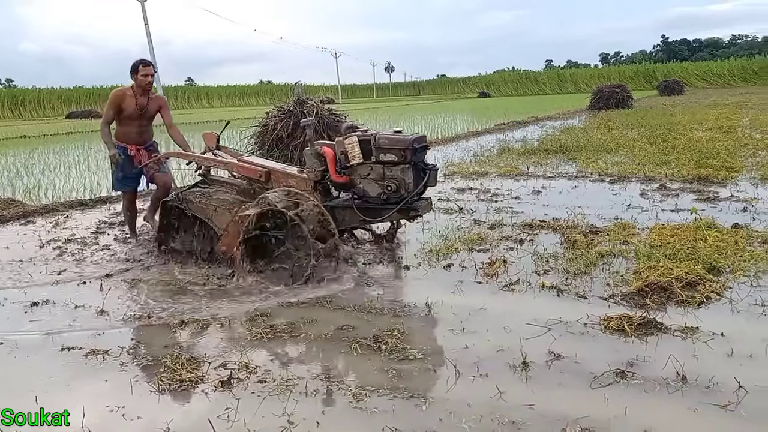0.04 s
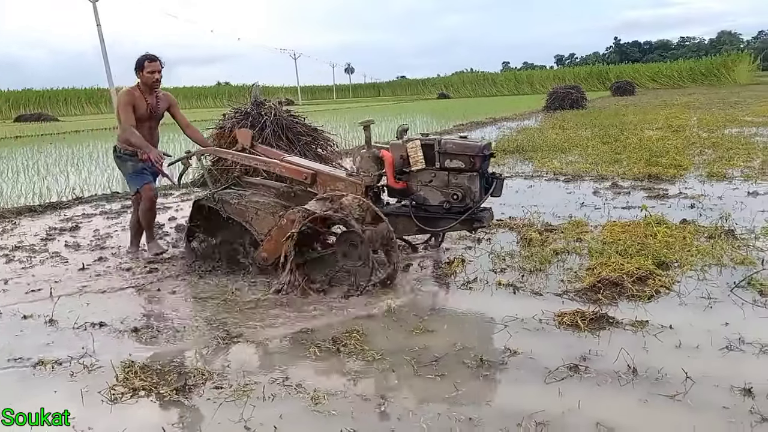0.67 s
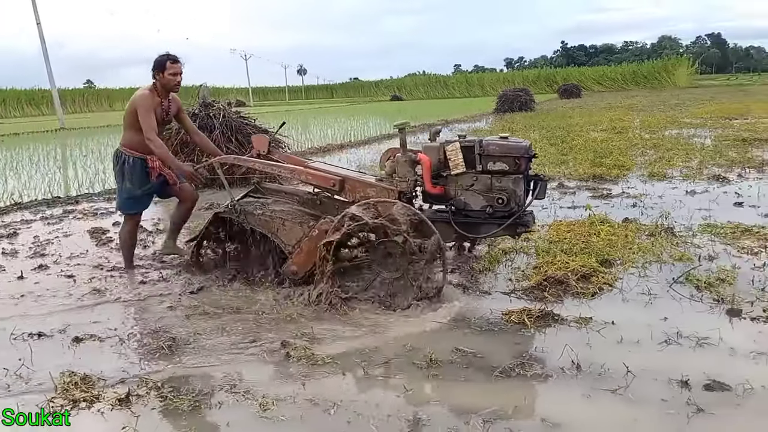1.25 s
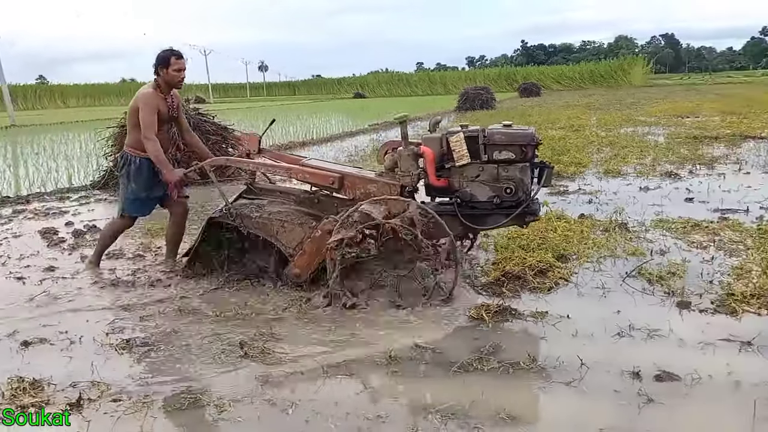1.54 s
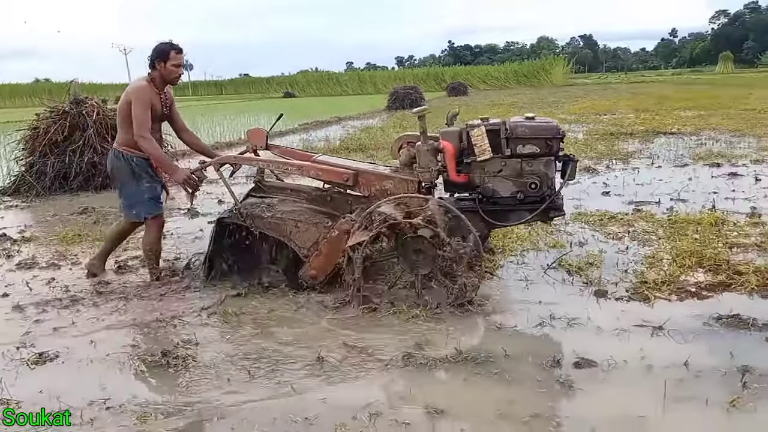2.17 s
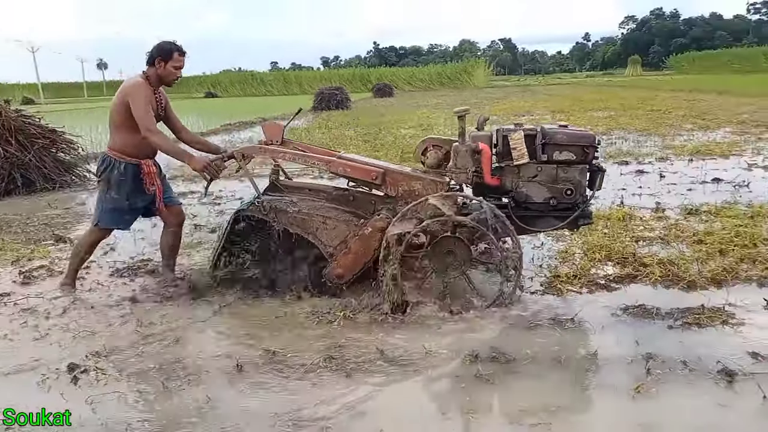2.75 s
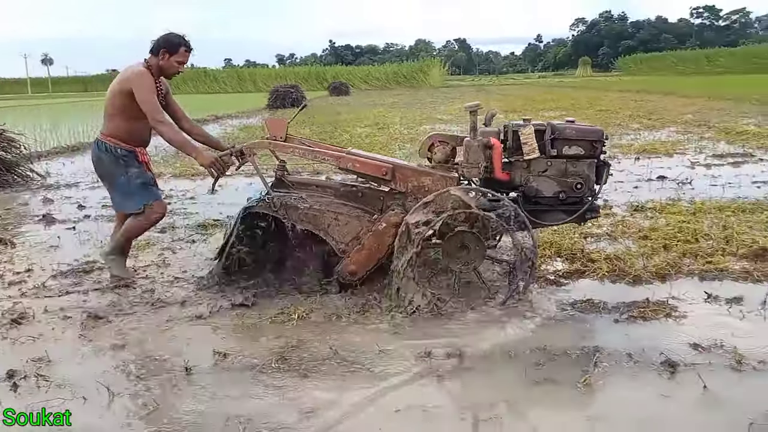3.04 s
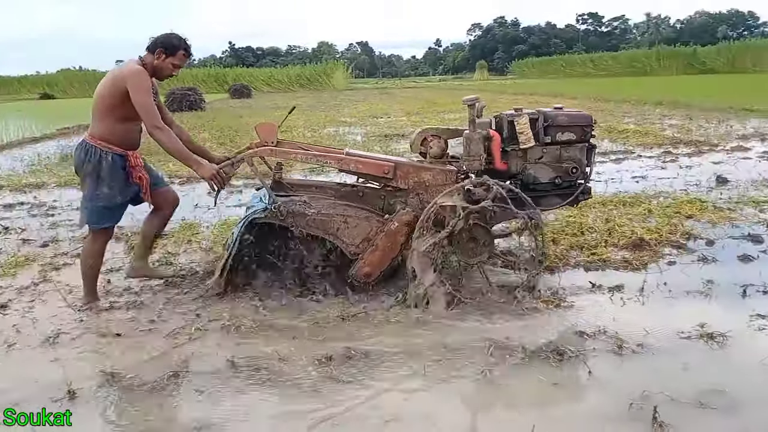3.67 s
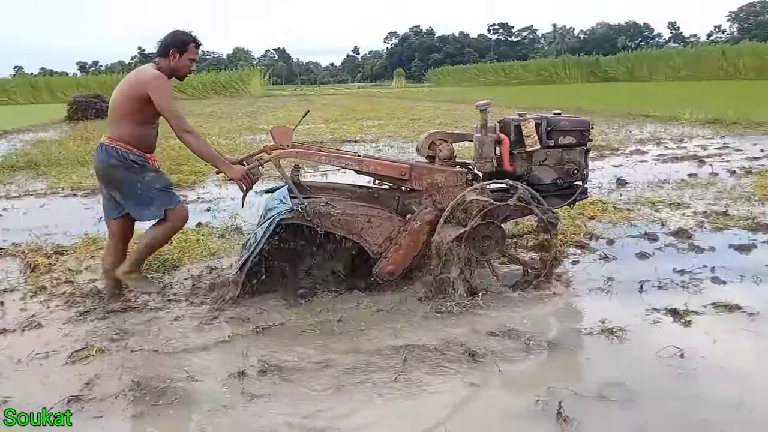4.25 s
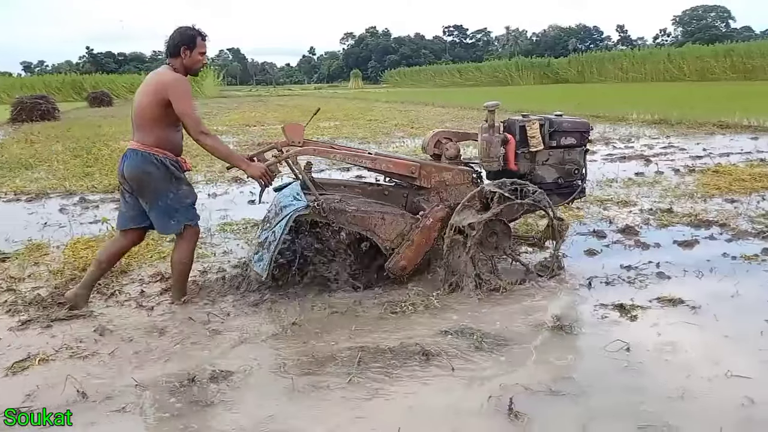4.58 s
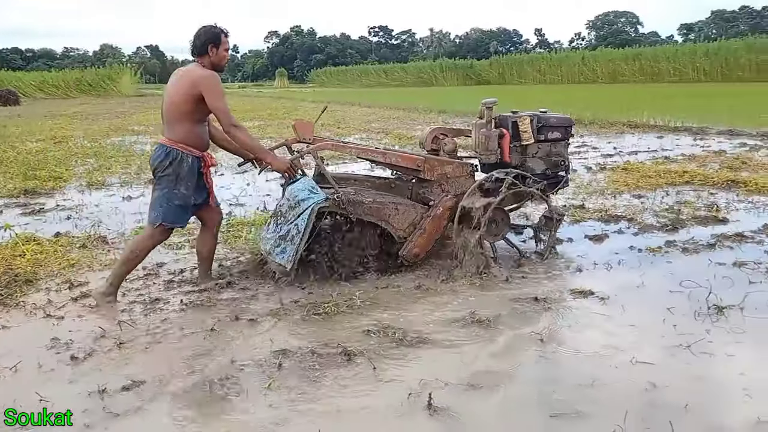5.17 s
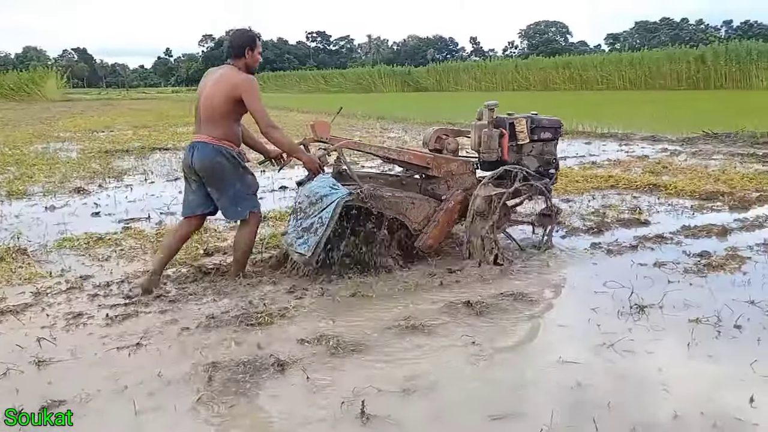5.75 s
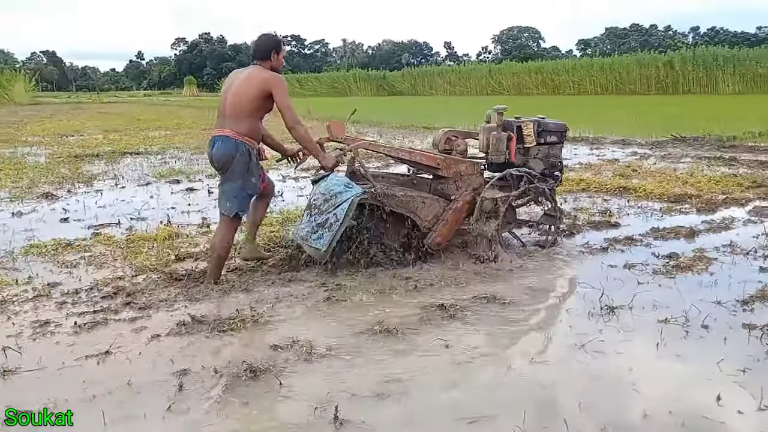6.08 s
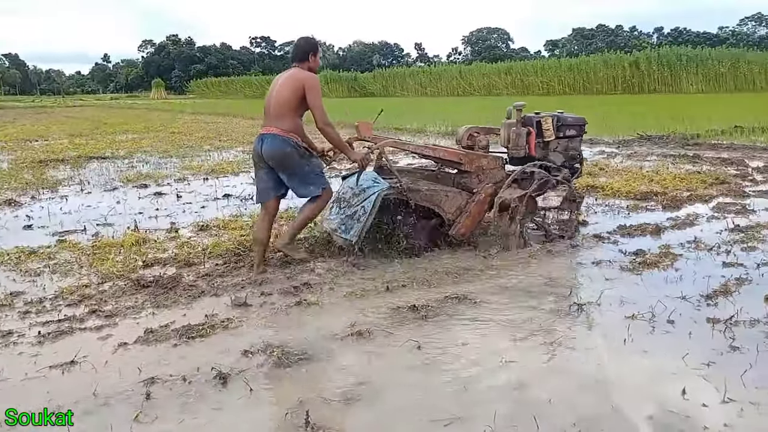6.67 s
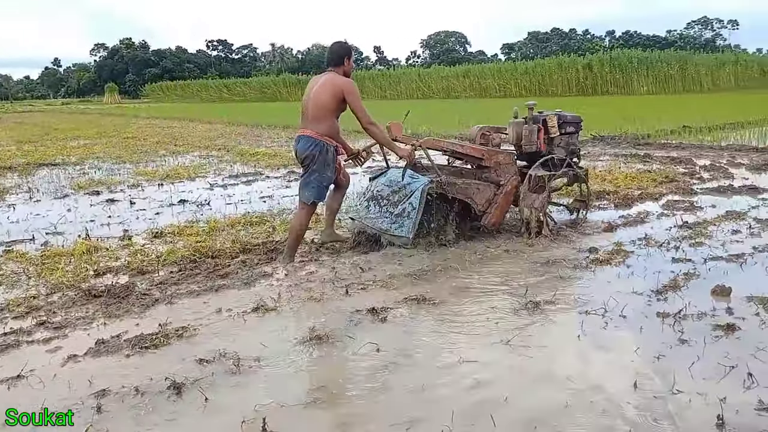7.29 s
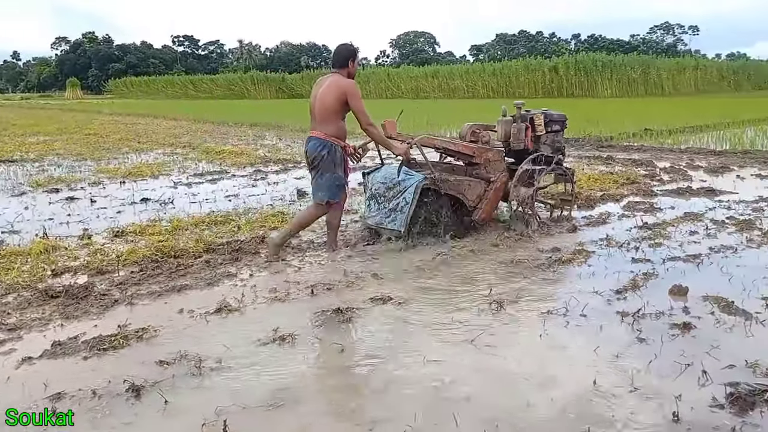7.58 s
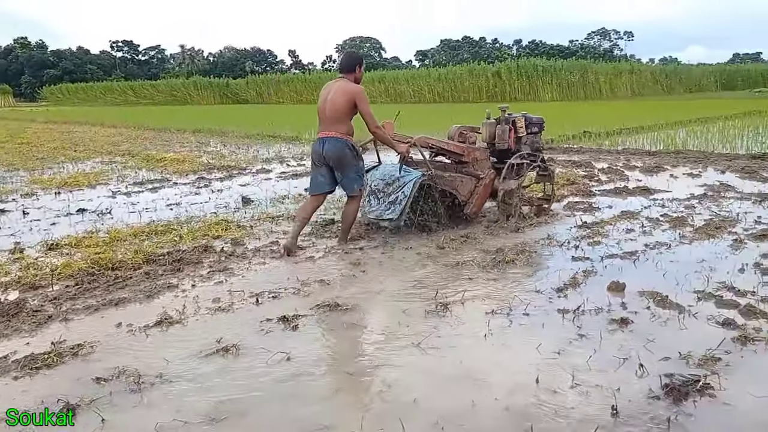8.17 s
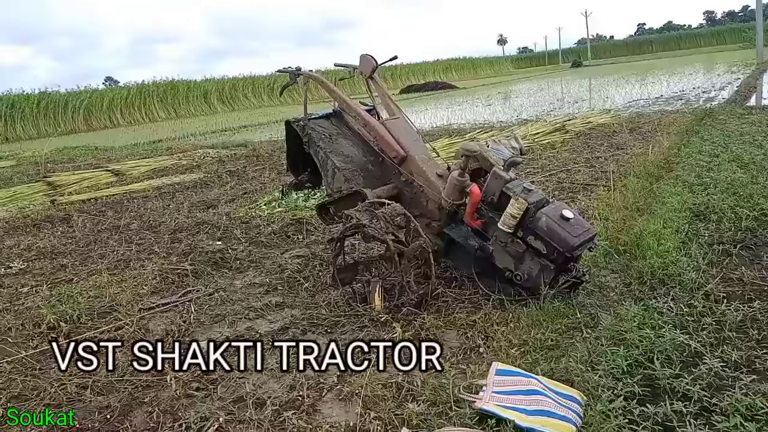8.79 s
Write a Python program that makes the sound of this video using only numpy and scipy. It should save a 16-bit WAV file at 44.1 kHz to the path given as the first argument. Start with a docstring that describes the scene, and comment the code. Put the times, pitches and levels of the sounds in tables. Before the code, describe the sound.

Outdoors in a wet field, a small diesel tiller works a few metres away, firing in a rapid, steady string of cracking, thumping puffs. Its iron engine knocks and rings, loudest at the start, while the tines softly spatter mud underneath. As it passes and turns away, the rattle lessens and the puffs sound hollower. The machine then fades out quickly, and only faint open air and insects remain.

```python
"""A walking tiller's single-cylinder four-stroke diesel churns past through a flooded field, a few metres
away, in open air. About 16.5 times a second the exhaust valve releases a turbulent burst of gas, heard
as a crack with a hiss, a hollow chuff and a low thump. Between the cracks, combustion knock and valve
gear excite the modes of the iron block, while the intake drones and the tines spatter mud.
At the end the machine fades out quickly and only the faint hush of the field, with insects, remains."""
import sys
import numpy as np
from scipy import signal
from scipy.fft import rfft, irfft, next_fast_len
from scipy.io import wavfile
from scipy.ndimage import uniform_filter1d

SR = 44100
rng = np.random.default_rng(int(sys.argv[2]) if len(sys.argv) > 2 else 0)


def bounce(signal):
    """Save signal as a 16-bit WAV file at the path given by the first command-line argument."""
    frames = np.transpose(np.atleast_2d(signal))
    limited = np.clip(frames, -1, 1)
    pcm = np.round(limited * 32767).astype(np.int16)
    wavfile.write(sys.argv[1], SR, pcm)


N = 398169
TIME = np.arange(N) / SR
PUFF_SAMPLES = 4096
PUFF_ONSET = PUFF_SAMPLES // 8  # samples ahead of a burst's peak

# Spectrum of the quiet field, with insects in the treble. Each row: frequency in Hz, gain in dB.
FIELD_SPECTRUM = [(30, -10), (90, 7.5), (300, -11), (1000, -12), (3500, -24), (5500, -41), (7500, -33),
                  (8200, -33), (9200, -15), (10800, -40)]
# Spectrum of the intake drone. Each row: frequency in Hz, gain in dB.
DRONE_SPECTRUM = [(30, -34), (70, 1.5), (100, -20), (130, 6.5), (170, -11.5), (260, -2), (350, -15),
                  (700, -48.5)]
# Broad spectrum of block and tinware. Each row: frequency in Hz, gain in dB.
BLOCK_SPECTRUM = [(40, -29.5), (130, -6.5), (250, -7.5), (390, -17.5), (550, -0.5), (1050, -1.5),
                  (1400, -4.5), (2900, -6), (4200, -19.5), (6300, -39), (7600, -29.5), (8600, -26.5),
                  (11000, -54.5), (15000, -34.5)]
# Modes of block, flywheel and covers, each beamed its own way. Each row: frequency in Hz, bandwidth in Hz,
# level in dB against the broad clatter, start and end in seconds of facing the listener.
BLOCK_MODES = [(541, 140, -7, 1.2, 7.98), (630, 72, -10, 0.9, 3.8), (728.6, 18, -5, 1.1, 4.42),
               (762, 47, -7, 2.05, 4.6), (877, 16, -7, .15, 7.05), (1034, 42, -6.5, 4.5, 11),
               (1524, 25, -12, 1.2, 4.5), (1663, 20, -13.5, .1, 4.5), (2300, 14, -12, .1, 4.3),
               (2800, 50, -16, 2.2, 5.5), (4110, 120, -17, 0.5, 0.95), (4950, 200, -25, 0.5, 1.2)]
# Blows of valve gear and combustion knock. Each row: delay after the exhaust crack as a share of
# the cycle, relative strength in dB, swell time in seconds.
BLOCK_BLOWS = [(.19, 5, 0.0081), (0.688, 8.5, 0.0044)]
# The clatter falls as the machine turns and walks away. Each row: time in seconds, level in dB.
CLATTER_LEVEL = [(0, -24.5), (0.75, -25), (1.0, -31), (1.35, -29.0), (1.85, -33), (2.45, -30.5),
                 (2.8, -32.5), (3.15, -31), (3.9, -31), (4.3, -33.0), (5.8, -32.0), (6.05, -36.5),
                 (6.75, -33.5), (7.7, -33), (8.05, -37.5), (8.8, -36.5)]
# Engine speed, as a running count of firings. Each row: time in seconds, firing number reached.
FIRING_COUNT = [(0.0028, 0), (0.606, 10), (1.3844, 23), (2.8353, 47), (3.618, 60), (5.0094, 83),
                (5.5577, 92), (6.2903, 104), (7.019, 116), (7.6206, 126), (8.528, 141), (8.8893, 147)]
# The heaviest puffs. Each row: time in seconds, thump level in dB, chuff level in dB, chuff pitch in Hz.
HEAVY_PUFFS = [(0.06, -25, -37, 380), (0.18, -21.5, -27, 288), (0.24, -27.5, -31, 450),
               (0.55, -24.5, -25.5, 296), (0.67, -26, -56, 390), (0.79, -24.5, -24, 336),
               (0.97, -41, -22.5, 296), (1.03, -28, -22.5, 270), (1.2, -31, -22.5, 438),
               (1.57, -23.5, -33, 350), (1.63, -26.5, -22, 355), (1.69, -26.5, -24, 415),
               (1.99, -42, -21, 370), (3.26, -22, -27.5, 300), (3.32, -36, -24, 336),
               (3.62, -31, -25.5, 450), (4.1, -31, -22.5, 390), (4.71, -37, -18.5, 333),
               (4.77, -25, -24, 520), (5.56, -32, -21, 318), (6.05, -25, -22.5, 360),
               (6.96, -24.5, -26, 445), (7.26, -26, -28.5, 327), (7.98, -27, -25, 430),
               (8.04, -30.5, -23.5, 440), (8.1, -43, -23.5, 374), (8.29, -36.5, -20.5, 358),
               (8.47, -32.5, -25, 390), (8.53, -33.5, -25, 315), (8.65, -35.5, -23.5, 320)]
# Spectrum of the gas hiss. Each row: frequency in Hz, gain in dB.
HISS_SPECTRUM = [(3000, 2.5), (4700, 1.5), (6300, -9.5), (7600, -5), (8300, 5), (9000, 3), (10000, -11),
                 (12200, -13.5), (14000, -7.5), (15300, -6)]
# Usual strength of the gas hiss. Each row: time in seconds, level in dB.
USUAL_HISS_LEVEL = [(0, -26.5), (1.5, -29.5), (2.7, -34.5), (5.3, -31.5), (5.8, -29.5), (7.3, -31.5),
                    (8.8, -29.5)]
# Firings that snap with extra hiss. Each row: time in seconds, level in dB above the usual hiss.
HISS_SNAPS = [(.67, 4.5), (3.14, 8.5), (4.34, 0.5), (4.7, 2), (5.8, 7.5), (6.04, 3.5), (8.41, 7)]
# The jet sounds higher while it points at the listener. Each row: time in seconds, favoured pitch in Hz.
JET_PITCH = [(1.05, 4050), (1.4, 2180), (8.8, 1750)]
# Spectrum of the exhaust crack. Each row: frequency in Hz, gain in dB.
CRACK_SPECTRUM = [(300, -23.5), (650, 1), (1100, 0), (1800, 0), (2900, 0), (3900, -4.5), (4800, -12),
                  (6500, -33.5)]
# Strength of the crack, which follows the drag of the mud. Each row: time in seconds, level in dB.
CRACK_LEVEL = [(0, -25.5), (0.67, -25.5), (1.0, -32.5), (1.35, -25.5), (2.4, -24.0), (4.7, -25.0),
               (5.0, -21.5), (5.3, -26.5), (6.15, -20.5), (6.45, -23.5), (7.5, -25.5), (7.8, -22.5),
               (8.2, -24.5), (8.7, -22.0)]


def undb(db):
    """Amplitude ratio of a level in decibels."""
    return 10 ** (np.asarray(db) / 20)


def unit(x):
    """Normalisation to an rms of 1."""
    return x / np.sqrt(np.mean(x ** 2))


def curves(table, times):
    """Linear interpolation of a table's columns at the given times."""
    row_times, *columns = np.transpose(table)
    return [np.interp(times, row_times, column) for column in columns]


def colour(x, spectrum):
    """Minimum-phase filter: folding the cepstrum of a (Hz, dB) shape makes its response causal."""
    size = next_fast_len(x.shape[-1] // 2 + 1) * 2
    hz = np.maximum(np.arange(size // 2 + 1) * SR / size, 1)
    row_hz, row_db = np.transpose(spectrum)
    gain = undb(np.interp(np.log(hz), np.log(row_hz), row_db))
    cepstrum = irfft(np.log(gain))
    cepstrum[1:size // 2] *= 2
    cepstrum[size // 2 + 1:] = 0
    return irfft(rfft(x, size) * np.exp(rfft(cepstrum)))[..., :x.shape[-1]]


def band(x, lo_hz, hi_hz):
    """Causal band-pass filter."""
    return signal.sosfilt(signal.butter(2, [lo_hz, hi_hz], "band", fs=SR, output="sos"), x)


def resonate(x, hz, width_hz):
    """Forced response of a damped oscillator with peak gain 1; hz may differ from row to row."""
    size = next_fast_len(x.shape[-1] // 2 + 1) * 2
    f = np.maximum(np.arange(size // 2 + 1) * SR / size, 1)
    return irfft(rfft(x, size) / (1 + 1j * (f - hz ** 2 / f) / width_hz))[..., :x.shape[-1]]


def drift(rate_hz):
    """Smoothed random steps give a slow fluctuation of rms 1."""
    hold = int(SR / rate_hz)
    steps = np.repeat(rng.standard_normal(N // hold + 1), hold)
    return unit(uniform_filter1d(uniform_filter1d(steps, hold), hold)[:N])


def field(level_db=-58):
    """Ambient noise: a faint open-air hush with a narrow band of insects."""
    return undb(level_db + .7 * drift(8)) * unit(colour(rng.standard_normal(N), FIELD_SPECTRUM))


def mud(drops_per_s=260, spread_db=4, splat_s=0.00067, level_db=-45):
    """Shot noise: clods and drops flung by the tines land as separate impacts, in uneven showers."""
    lands = rng.random(N) < drops_per_s / SR * undb(4 * drift(5))
    impacts = lands * undb(spread_db * np.minimum(rng.exponential(size=N), 4))
    t = np.arange(PUFF_SAMPLES) / SR
    splat = rng.standard_normal(PUFF_SAMPLES) * np.exp(-t / splat_s)
    return undb(level_db) * unit(band(signal.fftconvolve(impacts, splat)[:N], 600, 2100))


def clatter_excess_db(times, side_on_db=-32):
    """Relative level: how far the clatter stands above its level with the machine side-on."""
    return curves(CLATTER_LEVEL, times)[0] - side_on_db


def shaking(firings, repeat_share):
    """Cyclic vibration of moving parts: a share of the power recurs in every cycle, the rest is random."""
    since_s = TIME - firings[np.maximum(np.searchsorted(firings, TIME) - 1, 0)]
    pattern = rng.standard_normal(PUFF_SAMPLES)[(since_s * SR).astype(int) % PUFF_SAMPLES]
    return np.sqrt(repeat_share) * pattern + np.sqrt(1 - repeat_share) * rng.standard_normal(N)


def intake(firings, side_on_db=-43):
    """Nearly periodic forcing makes air cleaner and frame drone; they fade as the machine turns away."""
    drone = unit(colour(shaking(firings, repeat_share=0.84), DRONE_SPECTRUM))
    return drone * undb(side_on_db + clatter_excess_db(TIME))


def block(firings, whirr_db=-3, blow_scatter_db=2.5, turn_s=0.2):
    """Impact excitation: knock and valve gear ring the iron's modes over the whirr of gears, belt, fan."""
    power = np.full(N, undb(whirr_db) ** 2)  # incoherent sources add in power
    cycle_s = np.mean(np.diff(firings))
    t = np.arange(PUFF_SAMPLES) / SR
    for share, db, swell_s in BLOCK_BLOWS:
        starts = np.clip((firings + share * cycle_s) * SR, 0, N - 1).astype(int)
        blows = np.zeros(N)
        blows[starts] = undb(db + blow_scatter_db * rng.standard_normal(len(firings))) ** 2
        swell = t / swell_s * np.exp(1 - t / swell_s)
        power += signal.fftconvolve(blows, swell ** 2)[:N]
    drive = np.sqrt(np.abs(power))
    iron = unit(colour(drive * shaking(firings, repeat_share=0.18), BLOCK_SPECTRUM))
    for hz, width_hz, db, from_s, until_s in BLOCK_MODES:
        ring = unit(resonate(drive * shaking(firings, repeat_share=0.2), hz, width_hz))
        facing = (np.tanh((TIME - from_s) / turn_s) - np.tanh((TIME - until_s) / turn_s)) / 2
        iron += ring * undb(db) * facing
    return iron * undb(curves(CLATTER_LEVEL, TIME)[0])


def gas_bursts(firings, rise_s, fall_s, tail_db, tail_s):
    """Turbulent flow, a burst per firing: the cylinder blows down, then the piston expels the rest."""
    t = (np.arange(PUFF_SAMPLES) - PUFF_ONSET) / SR
    blowdown = np.exp(-(t / np.where(t < 0, rise_s, fall_s)) ** 2)
    stroke = undb(tail_db) * (t > 0) * np.exp(-np.abs(t) / tail_s)
    return rng.standard_normal((len(firings), PUFF_SAMPLES)) * np.hypot(blowdown, stroke)


def silencer(puffs, trip_s=0.0016, spread=.35):
    """Reflection: each burst echoes once, inverted, after a delay that varies with gas heat and speed."""
    lags = (trip_s * SR * (1 + spread * rng.uniform(-1, 1, (len(puffs), 1)))).astype(int)
    echoes = np.take_along_axis(puffs, (np.arange(PUFF_SAMPLES) - lags) % PUFF_SAMPLES, axis=1)
    return puffs - .5 * echoes


def pulse_train(puffs, times, db, scatter_db=0):
    """Superposition of puffs at the given times; db is the rms level over a whole cycle."""
    cycle_samples = np.mean(np.diff(times)) * SR
    rms = undb(db + scatter_db * rng.standard_normal(len(times)))
    gains = rms * np.sqrt(cycle_samples / np.sum(puffs ** 2, axis=1))
    train = np.zeros(N + 2 * PUFF_SAMPLES)
    for start, gain, puff in zip(np.maximum(times * SR, 0).astype(int), gains, puffs):
        train[start:start + PUFF_SAMPLES] += gain * puff
    return train[PUFF_ONSET:][:N]


def thump_and_chuff_settings(firings):
    """Uneven puffs thump more while the clatter is loud, chuff more while it is quiet; some are heavy."""
    chance = rng.standard_normal((len(firings), 3)).clip(-2, 1.3)
    excess_db = clatter_excess_db(firings)
    thump_db = -34 + .4 * excess_db + 4 * chance[:, 0]
    chuff_db = -31.5 - .6 * excess_db + 4.5 * chance[:, 1]
    chuff_hz = 341 * 2 ** (.3 * chance[:, 2])
    settings = np.column_stack([thump_db, chuff_db, chuff_hz])
    for time_s, *heavy in HEAVY_PUFFS:
        settings[np.argmin(np.abs(firings - time_s))] = heavy
    return settings.T


def hiss_levels(firings):
    """Level in dB of each firing's flow noise; a few snap out above the rest."""
    db = curves(USUAL_HISS_LEVEL, firings)[0]
    for time_s, extra_db in HISS_SNAPS:
        db[np.argmin(np.abs(firings - time_s))] += extra_db
    return db


def jet_cracks(firings, spill_db, scatter_octaves=0.77):
    """Jet noise: a sharp burst whose eddies favour a different pitch in every puff."""
    bursts = silencer(gas_bursts(firings, rise_s=0.0014, fall_s=0.0016,
                                 tail_db=spill_db - 13, tail_s=0.0064))
    octaves = scatter_octaves * rng.uniform(-1, 1, (len(firings), 1))
    eddy_hz = curves(JET_PITCH, firings[:, None])[0] * 2 ** octaves
    eddies = undb(spill_db - 1) * resonate(bursts, eddy_hz, width_hz=1500)
    return colour(bursts + eddies, CRACK_SPECTRUM)


def exhaust(firings):
    """Pulsating flow: each release of gas radiates a crack, a hiss, a resonant chuff and a deep thump."""
    thump_db, chuff_db, chuff_hz = thump_and_chuff_settings(firings)
    spill_db = 4 + clatter_excess_db(firings[:, None])  # stronger tails while the clatter is loud
    cracks = jet_cracks(firings, spill_db)
    hiss_gas = gas_bursts(firings, rise_s=0.0021, fall_s=0.0038, tail_db=spill_db - 14, tail_s=0.014)
    hisses = colour(silencer(hiss_gas), HISS_SPECTRUM)
    chuff_gas = gas_bursts(firings, rise_s=0.0015, fall_s=0.0012, tail_db=-35.5, tail_s=0.0051)
    chuffs = band(resonate(chuff_gas, chuff_hz[:, None], width_hz=210), 147, 740)
    thump_gas = gas_bursts(firings, rise_s=0.0013, fall_s=0.002, tail_db=-34, tail_s=0.012)
    thumps = band(thump_gas, 76, 220)
    # hiss and low pressure wave start as the valve opens, just ahead of the crack
    return (pulse_train(cracks, firings - .0005, curves(CRACK_LEVEL, firings)[0], scatter_db=1.5)
            + pulse_train(hisses, firings - .001, hiss_levels(firings), scatter_db=2.5)
            + pulse_train(chuffs, firings - .001, chuff_db)
            + pulse_train(thumps, firings - .0013, thump_db))


def scene(tiller_end_s=8.925, fade_s=.1):
    """Superposition of the field and the working tiller, which fades out quickly at the end."""
    reached_s, count = np.transpose(FIRING_COUNT)
    firings = np.interp(np.arange(count[-1] + 1), count, reached_s)
    tiller = exhaust(firings) + block(firings) + intake(firings) + mud()
    fade = np.clip((tiller_end_s - TIME) / fade_s, 0, 1)
    return (fade * tiller + field())[None]


def record(dry, ceiling=0.77, cutoff_hz=15400):
    """Soft saturation in the microphone rounds the tallest peaks; a low-pass cuts the top treble."""
    rounded = dry / (1 + (dry / ceiling) ** 4) ** (1 / 4)
    return signal.sosfilt(signal.ellip(8, .2, 70, cutoff_hz, fs=SR, output="sos"), rounded)


dry = scene()
out = record(dry)
bounce(out)
```